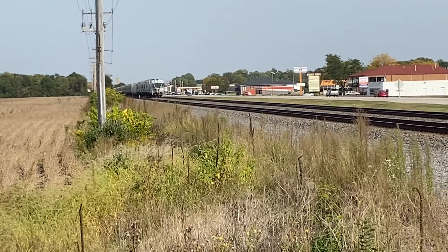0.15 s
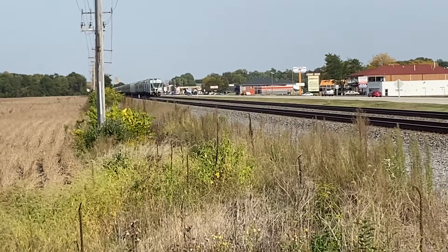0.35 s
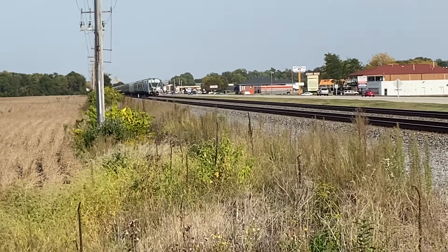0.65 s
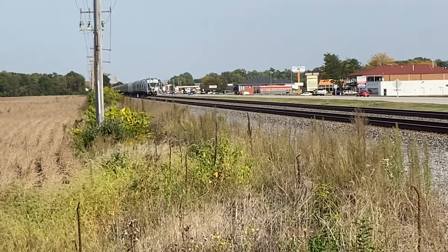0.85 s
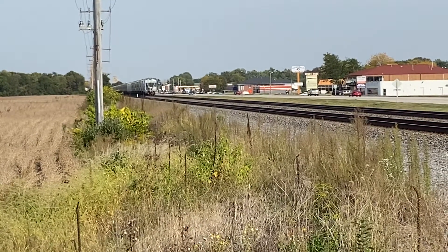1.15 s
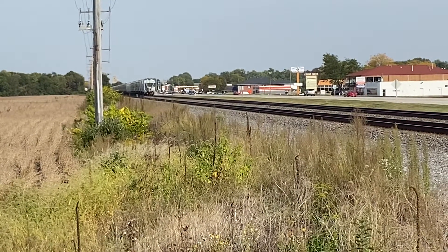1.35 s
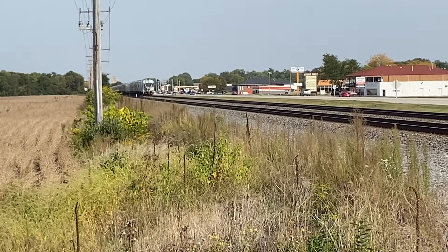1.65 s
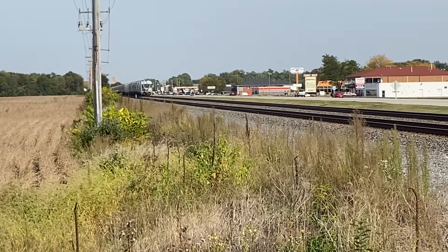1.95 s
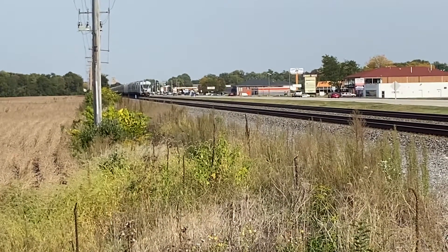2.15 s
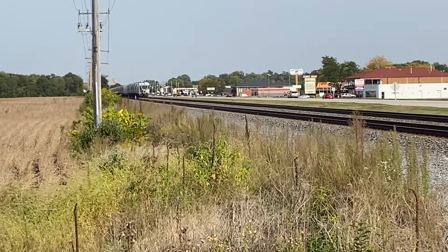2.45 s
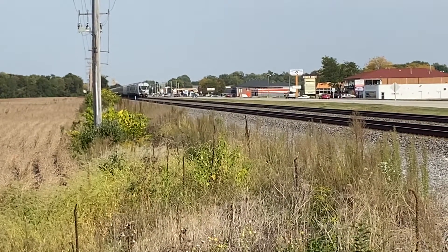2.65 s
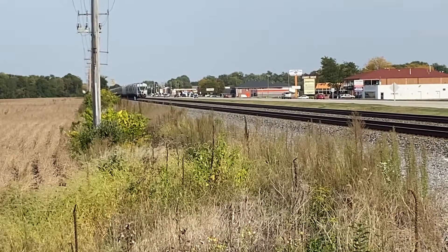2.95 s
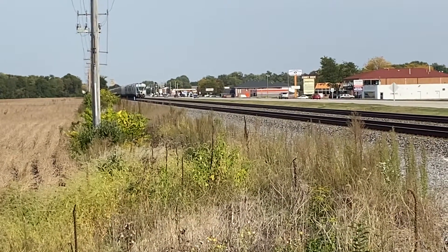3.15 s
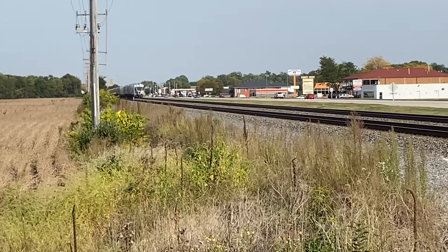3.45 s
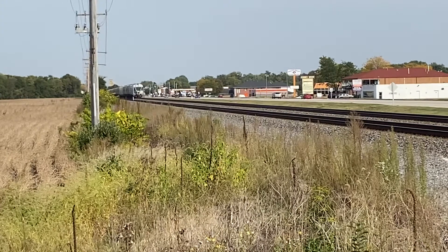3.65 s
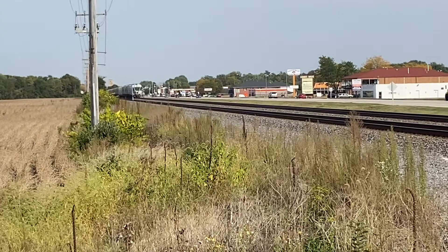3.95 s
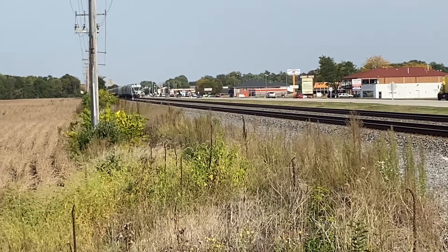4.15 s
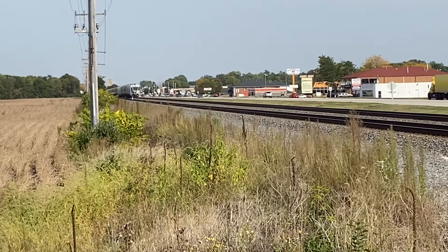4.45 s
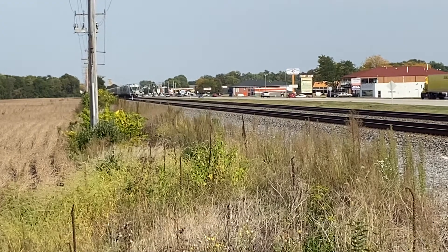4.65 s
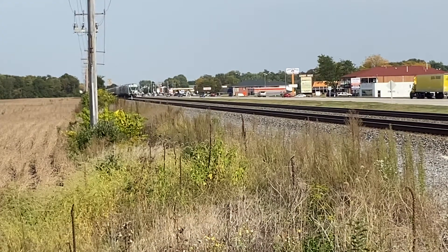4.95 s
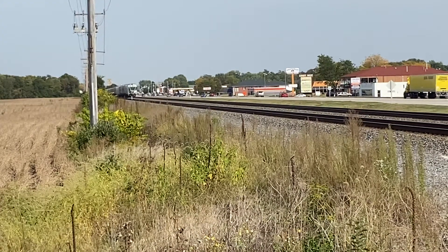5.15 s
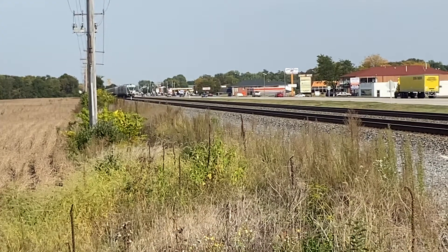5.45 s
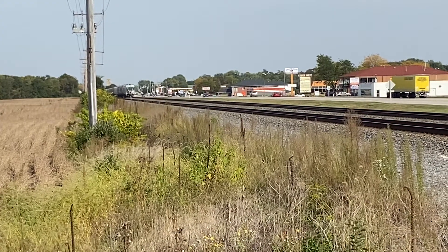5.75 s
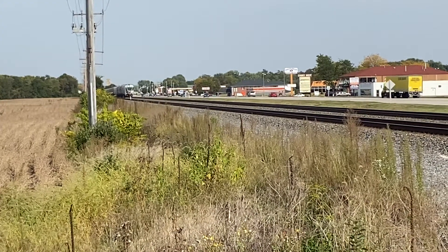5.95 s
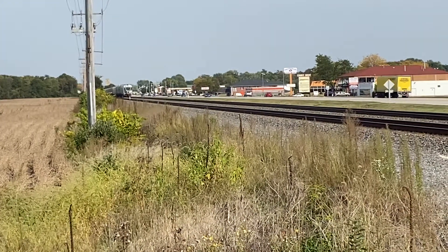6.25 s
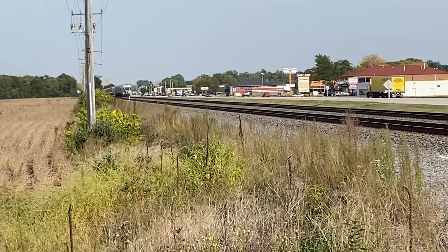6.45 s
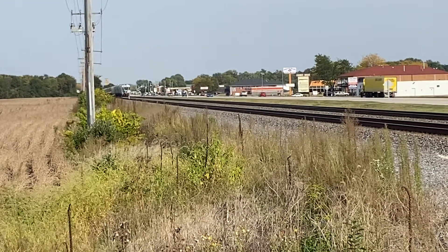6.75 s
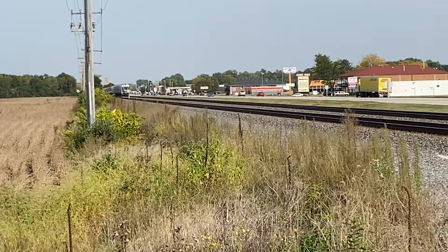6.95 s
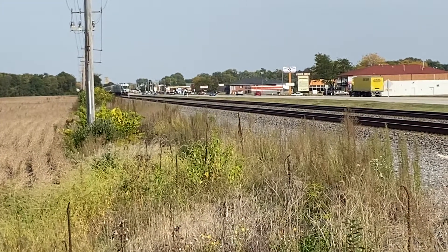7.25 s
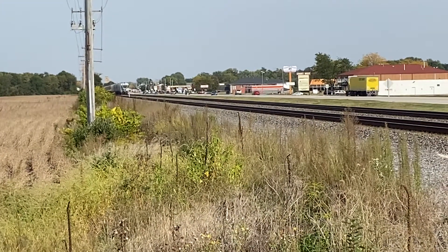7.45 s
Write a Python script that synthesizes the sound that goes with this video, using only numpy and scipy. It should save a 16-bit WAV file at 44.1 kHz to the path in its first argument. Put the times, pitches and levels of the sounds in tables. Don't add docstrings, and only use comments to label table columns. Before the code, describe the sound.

Throaty V8 truck revs up and passes outdoors, loudest near three seconds, then recedes as a small metal jingle sounds close by and a lorry drones.

```python
import sys
import numpy as np
from scipy import signal
from scipy.fft import rfft, irfft, next_fast_len
from scipy.io import wavfile
from scipy.ndimage import uniform_filter1d, map_coordinates

SR = 44100
rng = np.random.default_rng(int(sys.argv[2]) if len(sys.argv) > 2 else 0)


def gain_from_decibels(decibels):
    exponent = np.asarray(decibels, float) / 20
    return 10 ** exponent


def wav_record(signal):
    frames = np.transpose(np.atleast_2d(signal))
    bounded = np.clip(frames, -1, 1)
    quanta = np.round(bounded * 32767).astype(np.int16)
    wavfile.write(sys.argv[1], SR, quanta)


N = 335378
TOP_HZ = 15750
STEP = 8


def unit(x):
    return x / np.sqrt(np.mean(x ** 2) + 1e-20)


def along(points, hz):
    point_hz, value = np.transpose(points)
    return np.interp(np.log(hz + 1), np.log(point_hz + 1), value)


def curves(rows):
    time_s, *columns = np.transpose(rows)
    return [np.interp(np.arange(N) / SR, time_s, column) for column in columns]


def wobble(rate, size=1):
    coarse = np.arange(0, N + 32, 32)
    knots = rng.standard_normal(N // 1000)
    curve = map_coordinates(knots, [coarse * min(rate, 40) / SR])
    return np.interp(np.arange(0, N, size), coarse, curve)


def slow(rate):
    return wobble(rate, size=STEP)


def distance_db():
    nearest_s, reach_s = 2.85, 1.08
    return -10 * np.log10(1 + ((np.arange(N) / SR - nearest_s) / reach_s) ** 2)


# pitch_hz, level_db
OCTAVE_COLOUR = [(190, -38), (236, -27), (270, -38), (306, -48), (324, -27), (346, -35.5), (430, -49),
                 (460, -35)]


def firing_tone(cycle, firing_hz, tone_db, far_db, falling):
    octave_db = along(OCTAVE_COLOUR, 2 * firing_hz) + far_db + 3 * falling
    tone = gain_from_decibels(tone_db + .8 * slow(14)) * np.cos(8 * cycle + .12 * slow(20))
    octave = gain_from_decibels(octave_db + 1.5 + 1.5 * slow(10)) * np.cos(16 * cycle + .5 * slow(4))
    return tone + octave


# multiple of the engine cycle, level_db
BURBLE = [(2, -15), (3, 0.6), (4, -3.5), (5, 1), (6, -5), (7, -10.5), (9, -1), (10, -4), (11, 1.5),
          (12, -6), (13, 0.5), (14, -7.5), (15, -11.5)]
# pitch_hz, level_db
PIPE = [(25.0, -33), (50.0, -15), (75.0, -7), (100.0, -0.5), (125.0, -8), (160.0, -0.15), (200.0, -9),
        (240.0, -2), (290.0, -11), (325.0, -6.5), (380.0, -26.5), (460.0, -9), (550.0, -18.5), (700.0, -39)]


def burble(cycle, firing_hz, tone_db, scatter, far_db, falling, flutter_db, drift):
    load_db = tone_db + 20
    revs_db = 20 * np.log10(firing_hz / 160)
    low_db = -22 + 0.96 * far_db - 0.01 * load_db + revs_db
    high_db = -25.5 + 0.86 * far_db + 0.3147 * load_db + 1.38 * revs_db
    high_db = high_db + 4.5 * np.clip(1 - scatter, 0, 1) + 6 * falling
    out = 0
    for k, db in BURBLE:
        hz = firing_hz * k / 8
        level_db = (low_db if k < 8 else high_db) + db + along(PIPE, hz)
        pipe_lag = 1.1 * np.arctan((hz - 205) / 12) + 1.4
        phase = k * cycle - (k > 8) * pipe_lag
        phase = phase + scatter * (drift * slow(1.5) + rng.uniform(-np.pi, np.pi))
        out = out + gain_from_decibels(level_db + flutter_db * slow(2.564) + 1.2 * slow(12)) * np.cos(phase)
    return out


# multiple of the engine cycle, level_db under the firing tone
RASP = [(17, -35), (18, -28), (19, -27.5), (20, -32.5), (21, -41), (22, -30.5), (23, -34.5), (24, -39.5),
        (25, -43.5), (26, -31), (27, -37)]
# pitch_hz, level_db
TAILPIPE = [(300, 4), (370, -0.5), (480, 6), (560, 3), (700, -9.5)]


def rasp(cycle, firing_hz, tone_db):
    aim_s, turn_s, shaded_db = 3.15, .2, -8.5
    t = np.arange(0, N, STEP) / SR
    rasp_db = tone_db - 2.0 + shaded_db * (1 - np.tanh((t - aim_s) / turn_s)) / 2
    out = 0
    for k, db in RASP:
        level_db = rasp_db + db + along(TAILPIPE, firing_hz * k / 8) + 2.2 * slow(2.5)
        out = out + gain_from_decibels(level_db) * np.cos(k * cycle + 1.8 * slow(6))
    return out


def cross_view(engine):
    cross_s, swing_s, pan_s = 2.736, 0.39, .6
    i = np.arange(N)
    lead_ms = -0.84 + (0.51 + 0.84) * (1 + np.tanh((i / SR - cross_s) / swing_s)) / 2
    pan_db = 1.3 + (2.5 - 1.3) * (1 + np.tanh((i / SR - cross_s) / pan_s)) / 2
    half = lead_ms * SR / 2000
    return np.array([gain_from_decibels(side * pan_db / 2) * map_coordinates(engine, [(i + side * half) / STEP], mode="nearest")
                     for side in (1, -1)])


# time_s, firing_rate_hz, firing_tone_db
ENGINE = [(0, 94.1, -31), (.8, 101.8, -21.5), (1.15, 117.4, -22.5), (1.5, 120.4, -23), (2.13, 142.3, -20.5),
          (2.5, 151.8, -16), (2.75, 154.4, -11.5), (3.05, 159.8, -12.5), (3.25, 162, -14.5),
          (4.25, 174.9, -16), (5.0, 189.1, -24.5), (5.6, 199.2, -35), (5.9, 206.7, -29.5),
          (6.5, 218.7, -27.5), (6.88, 228.9, -23.5), (7.1, 217.4, -24), (7.27, 192, -38), (7.6, 165, -25.5)]
# time_s, scatter (0 to 1)
IN_STEP = [(0, 0.55), (.9, 0.5), (1.8, 0.15), (2.3, 0.13), (2.65, 0.94), (7.6, 0.98)]


def pickup(flutter_db, drift):
    firing_hz, tone_db, scatter, far_db = [c[::STEP] for c in (*curves(ENGINE), *curves(IN_STEP), distance_db())]
    cycle = 2 * np.pi * np.cumsum(firing_hz) * STEP / SR / 8
    falling_hz_per_s = -np.gradient(firing_hz) * SR / STEP
    falling = uniform_filter1d(np.clip(falling_hz_per_s / 80, 0, 1), size=900)
    engine = rasp(cycle, firing_hz, tone_db)
    engine = engine - firing_tone(cycle, firing_hz, tone_db, far_db, falling)
    engine = engine - burble(cycle, firing_hz, tone_db, scatter, far_db, falling, flutter_db, drift)
    full_cycle = np.interp(np.arange(N) / STEP, np.arange(len(cycle)), cycle)
    return np.sqrt(2) * gain_from_decibels(0.93) * cross_view(engine), full_cycle


# pitch_hz, likeness (0 to 1)
ALIKE = [(60, 0.82), (200, 1), (400, 0.81), (700, 0.53), (1300, 0.23), (1900, 0.88), (2500, 0.95),
         (3000, 1)]
# pitch_hz, lead_radians
LEAD = [(0, 0), (690, 2), (1380, 2.5), (1890, 1), (2150, 0)]
# pitch_hz, level_db
LEAN = [(60, 0), (200, -1), (380, -1), (700, -1), (1290, -4), (2400, 0), (15000, 0)]


def rush(spectrum, patchy_db):
    z = signal.stft(rng.standard_normal((2, N)), nperseg=512)[2]
    patches = uniform_filter1d(rng.standard_normal(z.shape[1:]), size=8, axis=0)
    patches = unit(uniform_filter1d(patches, size=12, axis=1))
    noise = signal.istft(z * gain_from_decibels(patchy_db * patches), nperseg=512)[1]
    m = next_fast_len(N)
    a, b = rfft(noise, m)
    hz = np.fft.rfftfreq(m, 1 / SR)
    skew = gain_from_decibels(along(LEAN, hz) / 2) * np.exp(.5j * np.interp(hz, *np.transpose(LEAD)))
    turn = np.arccos(np.clip(along(ALIKE, hz), -1, 1)) / 2
    left = np.cos(turn) * a + np.sin(turn) * b
    right = np.cos(turn) * a - np.sin(turn) * b
    colour = gain_from_decibels(along(spectrum, hz)) * (hz < TOP_HZ)
    return unit(irfft(colour * [left * skew, right / skew], m)[:, :N])


# time_s, length_s, level_db over the far traffic
PASSES = [
    (.3, .5, 3.2),
    (1.498, 0.54, 9),
    (2.05, 0.22, 5.5),
    (2.9, 0.5, 10.5),
    (3.7, 0.46, 4.5),
    (4.5, .4, 2),
    (5.342, 0.37, 8.5),
    (6.4, .25, 3),
    (7.25, 0.83, 2.5),
]


def passes_db():
    t = np.arange(N) / SR
    return 10 * np.log10(1 + sum(gain_from_decibels(2 * db) * np.exp(-((t - s) / length) ** 2) for s, length, db in PASSES))


# pitch_hz, level_db (per Hz)
RUMBLE = [(15, -44.5), (25, -8.5), (40, 10.5), (60, 11.5), (100, 14.5), (200, 3.5), (330, -5.5), (500, -38)]
ROAR = [(120, -9.5), (250, 3), (400, -2.5), (700, -4), (1200, -8.5), (1800, -16.5), (3000, -62.5)]
TYRE = [(700, -16.5), (1200, 1), (1700, 1.5), (2200, -1), (3200, -5.5), (4500, -17.5), (7000, -55.5)]
HISS = [(2200, -33.5), (3500, -0.5), (4500, 2.5), (6300, -4.5), (7500, -7), (9000, -7.5), (11000, -18.5),
        (13000, -22), (14500, -37), (15500, -40)]
# level_db, then shares (1 is the whole change) of distance loss, passes and lorry swell
LAYERS = [
    (-31.5, 0.7, 0.14, 0.85),
    (-34.5, 0.24, 0.062, .1),
    (-46.5, 0.14, 0.52, 0.15),
    (-59.5, .1, 1.055, .05),
]


def road(cycle):
    lorry_s, length_s, lorry_db = 4.75, .6, 5
    heavy_db = lorry_db * np.exp(-((np.arange(N) / SR - lorry_s) / length_s) ** 2)
    far_db, busy_db = distance_db(), passes_db()
    rumble_db, roar_db, tyre_db, hiss_db = [db + far * far_db + busy * busy_db + heavy * heavy_db
                                            for db, far, busy, heavy in LAYERS]
    swell = wobble(7)
    throb = 1 + .25 * np.sin(8 * cycle)
    return (gain_from_decibels(rumble_db + 0.5) * rush(RUMBLE, patchy_db=1.15)
            + gain_from_decibels(roar_db + 3.0 + 1.0 * swell) * throb * rush(ROAR, patchy_db=-0.15)
            + gain_from_decibels(tyre_db + 2.0 + 0.28 * swell) * rush(TYRE, patchy_db=1.18)
            + gain_from_decibels(hiss_db - 1.5 + 0.46 * swell) * rush(HISS, patchy_db=1.3))


def ring(hz, t60, attack):
    t = np.arange(SR // 4) / SR
    return gain_from_decibels(-60 * t / t60) * (1 - np.exp(-t / attack)) * np.sin(2 * np.pi * (hz * t + rng.random()))


# start_s, peak_db, thin_ring_db
JINGLE = [(4.8642, -24, -27), (4.869, -21.5, -37), (4.8718, -19.5, -34.5), (4.874, -27, -22),
          (4.8787, -30, -33), (4.885, -31.5, -21), (4.8927, -29.5, -23), (4.895, -26, -17),
          (4.9385, -30, -16.5), (4.9706, -30, -17), (5.045, -34.5, -14), (5.101, -34, -17),
          (5.6397, -35.5, -19), (6.1894, -43, -15), (6.2694, -45.5, -25), (6.7503, -37.5, -22),
          (6.8994, -36, -22), (7.1832, -34, -33)]
# pitch_hz, level_db, t60_s
BUCKLE = [(2770, -4.5, 0.016), (3790, -2, 0.027), (4200, 0, 0.026), (5100, -2.5, 0.016),
          (5360, -6.5, 0.035), (5900, -8.5, 0.043), (7360, -10, 0.018), (8400, -17, 0.01)]
# pitch_hz, level_db, t60_s
LINK = [(10165, 0, .12), (12037, 0, .12), (14024, -3, .12), (15122, 0, .12)]
# start_s, pitch_hz, peak_db, t60_s
KNOCKS = [
    (0.378, 5900, -39, 0.012),
    (.381, 600, -19, 0.015),
    (.4, 567, -17, 0.036),
    (4.8685, 2862, -21.5, 0.026),
    (6.301, 2202, -27.5, 0.033),
    (6.325, 3275, -37, .09),
]


def buckle():
    out = np.zeros(N + SR)
    for s, db, thin_db in JINGLE:
        body = sum(gain_from_decibels(level + rng.normal(0, 3)) * ring(hz, t60, attack=.0004) for hz, level, t60 in BUCKLE)
        thin = sum(gain_from_decibels(level + rng.normal(0, 2.1)) * ring(hz, t60, attack=0.0017) for hz, level, t60 in LINK)
        grit = np.convolve(rng.standard_normal(len(body)), [1, 1, 0, -1, -1], "same")
        scrape = gain_from_decibels(-60 * np.arange(len(body)) / SR / .04) * grit
        touch = gain_from_decibels(db - 12.0) * (body + gain_from_decibels(-12.0) * scrape) + gain_from_decibels(db + thin_db - 4.0) * thin
        out[round(s * SR):][:len(body)] += touch
    for s, hz, db, t60 in KNOCKS:
        out[round(s * SR):][:SR // 4] += gain_from_decibels(db) * ring(hz, t60, attack=.0008)
    return out[:N]


# start_s, t60_s, from_hz, to_hz, level_db
RATTLES = [
    (2.9, 1.1, 737, 980, -31.5),
    (3.3, 3.5, 400, 580, -37),
    (4.858, 0.3, 2360, 6973, -30.5),
    (4.858, .2, 9640, 15450, -56),
    (4.94, 0.43, 3001, 8300, -39),
    (5.029, 1.2, 3000, 8220, -47.5),
    (6.18, 0.31, 5000, 12100, -52.5),
    (6.3, .35, 1904, 4340, -38.5),
    (6.31, 0.33, 4980, 12400, -51.5),
]


def rattle():
    out, t = np.zeros(N + SR), np.arange(SR) / SR
    for s, t60, from_hz, to_hz, db in RATTLES:
        clicks = rng.standard_normal(SR) * gain_from_decibels(4.3 * rng.exponential(size=SR).clip(0, 4))
        band = signal.butter(3, [from_hz, to_hz], "band", fs=SR, output="sos")
        rise = np.clip(t / (.06 * t60), 0, 1) ** 2
        out[round(s * SR):][:SR] += gain_from_decibels(db - 60 * t / t60) * rise * unit(signal.sosfilt(band, clicks))
    return out[:N]


# start_s, length_s, from_hz, to_hz, level_db
SQUEAKS = [
    (.85, .1, 3280, 3360, -50),
    (.86, .08, 6600, 6640, -66),
    (1.45, .2, 6560, 6660, -59),
    (4.99, .28, 1985, 2025, -48),
    (5.4, 1.1, 2060, 2050, -55),
    (6.61, .15, 3090, 3110, -55),
    (6.63, .12, 3230, 3240, -56),
]


def squeaks():
    out = np.zeros(N)
    shake, flicker = wobble(30), wobble(25)
    for s, length, from_hz, to_hz, db in SQUEAKS:
        i = round(s * SR) + np.arange(round(length * SR))
        hz = np.linspace(from_hz, to_hz, len(i)) * (1 + .004 * shake[i])
        tone = np.sin(2 * np.pi * np.cumsum(hz) / SR)
        out[i] += gain_from_decibels(db + 2.4 * flicker[i]) * np.hanning(len(i)) ** .4 * tone
    return out


# time_s, firing_rate_hz, level_db
LORRY = [(4.6, 48.51, -60), (5.3, 48.35, -35.5), (6, 47.8, -33), (6.8, 47.76, -35), (7.3, 47, -36),
         (7.6, 47.7, -38)]
# multiple of the firing rate, level_db
LORRY_ORDERS = [(1, -5), (2, 2), (3, -7), (4, -12)]


def lorry():
    hz, db = curves(LORRY)
    turn = 2 * np.pi * np.cumsum(hz) / SR
    drone = sum(gain_from_decibels(level + 2.5 * wobble(6)) * np.sin(k * turn + .8 * wobble(5)) for k, level in LORRY_ORDERS)
    return np.sqrt(2) * gain_from_decibels(db) * drone * gain_from_decibels([[1.1], [-.9]])


def cricket(hz, db):
    t = np.arange(N) / SR
    chirps = np.clip(np.sin(2 * np.pi * 4.6 * t + 1.6 * wobble(1.5)), 0, 1) ** 1.5
    return gain_from_decibels(db) * chirps * wobble(40) * np.sin(2 * np.pi * hz * t + 2.5 * wobble(40))


def scene():
    engine, cycle = pickup(flutter_db=0.5, drift=1.45)
    near = buckle() + rattle()
    far = squeaks() + lorry() + cricket(hz=8760, db=-57.5)
    return engine + road(cycle) + near + far


# pitch_hz, lead_half_turns
HALF_TURNS = [(7400, 0), (8900, 1), (9500, 1), (10500, 2), (11600, 2), (12600, 3), (13700, 3), (14600, 4)]


def opposed(hz):
    return np.exp(1j * np.pi * np.interp(hz, *np.transpose(HALF_TURNS)))


def roll_off(x):
    return signal.sosfilt(signal.butter(12, 16530, fs=SR, output="sos"), x)


def record(dry):
    m = next_fast_len(N)
    hz = np.fft.rfftfreq(m, 1 / SR)
    heard = hz < TOP_HZ
    ports = irfft(rfft(dry, m) * [heard, opposed(hz) * heard], m)[:, :N]
    return roll_off(ports)


dry = scene()
out = record(dry)
wav_record(out)
```